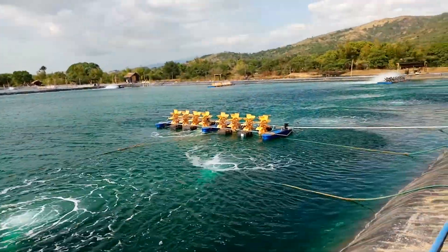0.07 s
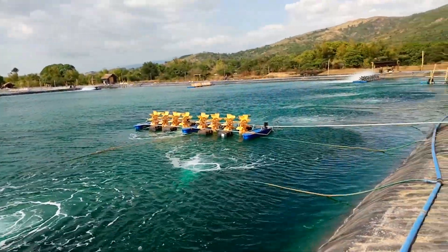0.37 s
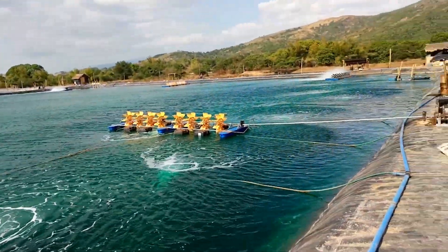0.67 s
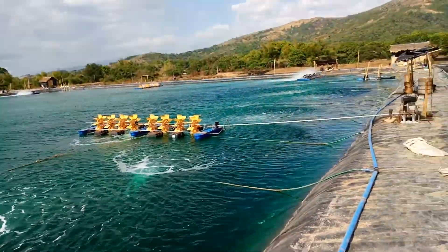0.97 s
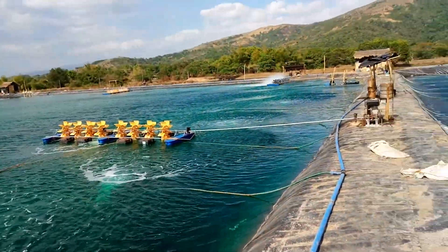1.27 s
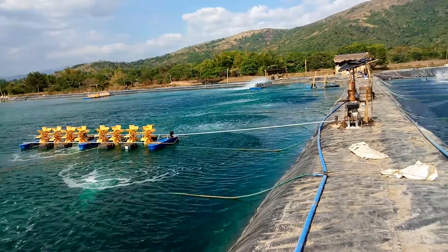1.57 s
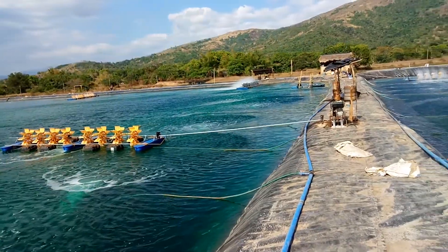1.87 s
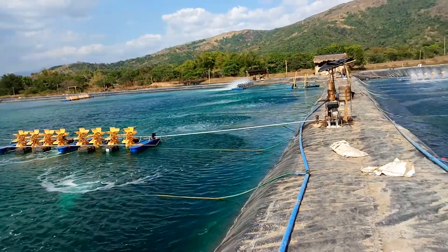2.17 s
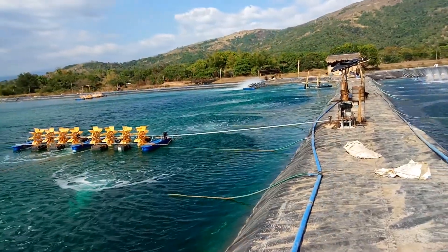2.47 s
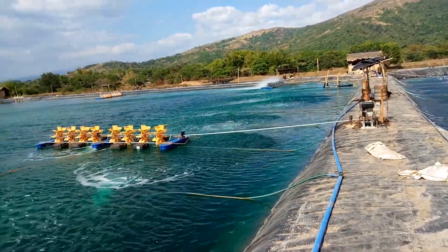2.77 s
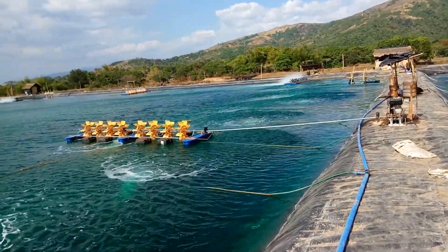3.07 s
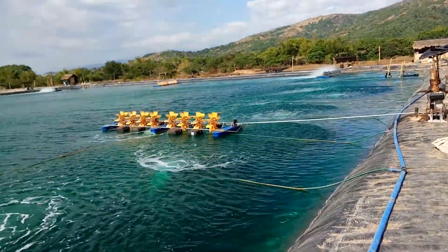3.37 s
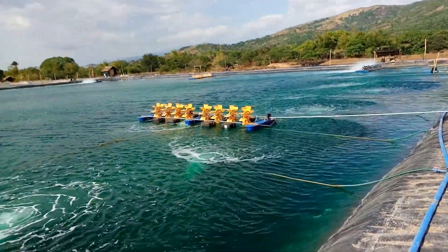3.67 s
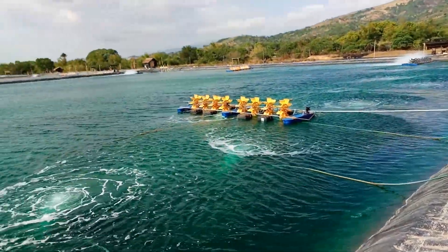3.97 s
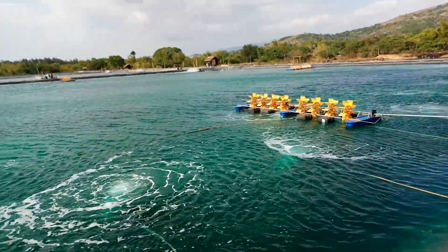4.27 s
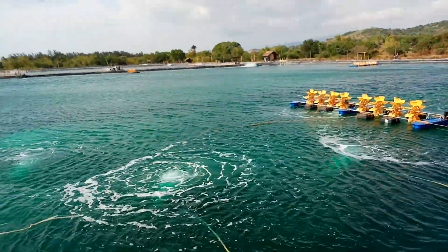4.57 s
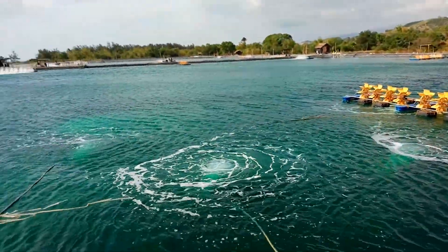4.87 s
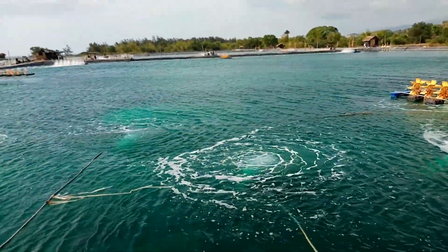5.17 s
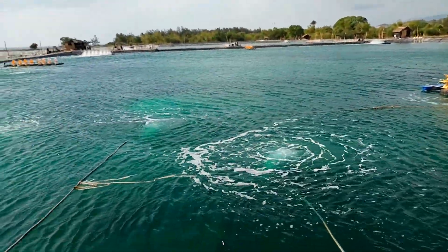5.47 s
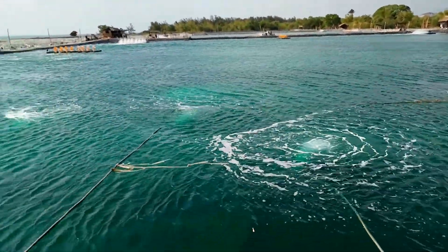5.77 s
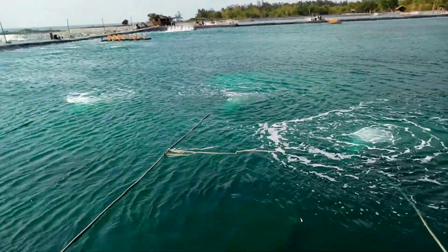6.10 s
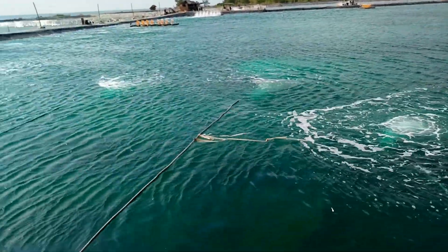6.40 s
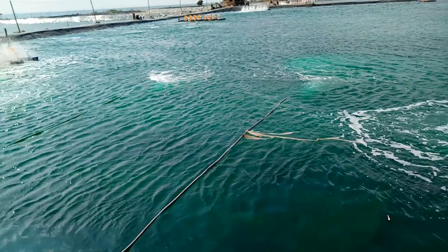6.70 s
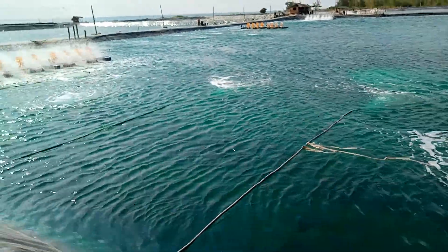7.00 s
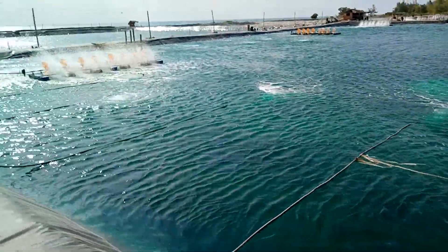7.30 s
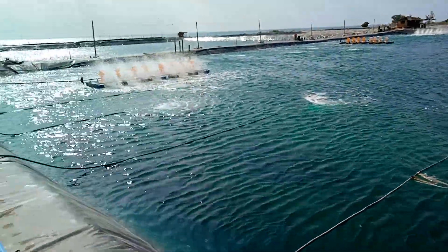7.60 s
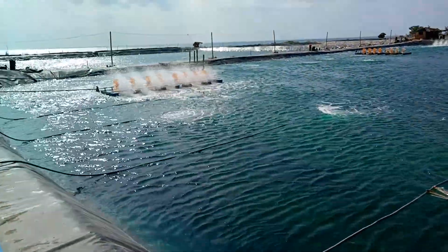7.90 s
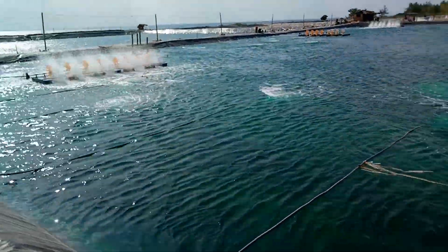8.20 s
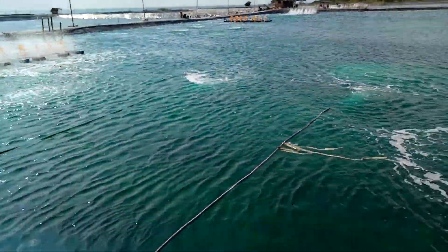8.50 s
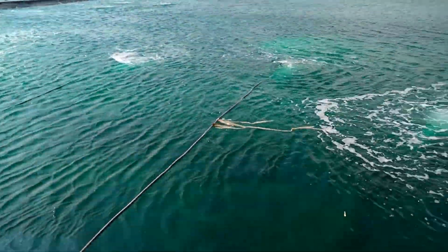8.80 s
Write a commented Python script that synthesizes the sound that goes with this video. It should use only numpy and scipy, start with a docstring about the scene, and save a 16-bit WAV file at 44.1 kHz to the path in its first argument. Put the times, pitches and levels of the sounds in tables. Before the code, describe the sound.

Paddle-wheel aerators churn a large outdoor pond throughout, with sloshing water, hissing spray and small bubbles. Two diesel engines thud slightly out of step, their valves clattering and gears grinding mainly on the left. From the start until about 4 seconds, a dry bearing gives short, high, irregular chirps. Wind rumbles, flutters and pops on the right side of the handheld microphone, with a small dry tick near 1.4 seconds. Foam fizzes briefly around 4.5 seconds. At about 5.3 seconds a hard gust hits with deep thumps, and loud, ragged tearing continues, strongest around 6.5 to 7.3 seconds, pushing the water and engines down beneath it. The metallic clatter grows brighter from about 6.5 seconds. The wind drops briefly near 8 seconds, exposing spray and engine rattle, then buffets hard again until the end, just before 9 seconds.

```python
"""A fish pond in gusty wind. Paddle-wheel aerators churn the water and throw spray; bubbles ring, foam fizzes.
Two slow single-cylinder diesels drive them: exhausts thud, valves clatter, gears grind, a dry bearing chirps.
A handheld microphone pans from the bank across the water towards a spraying wheel.
Gusts buffet its right port, tearing harder and harder, and a compressor ducks the pond under them."""
import sys
import numpy as np
from scipy import signal
from scipy.fft import rfft, irfft, next_fast_len
from scipy.io import wavfile
from scipy.ndimage import uniform_filter1d, map_coordinates

SR = 44100
rng = np.random.default_rng(int(sys.argv[2]) if len(sys.argv) > 2 else 0)


def inscribe(sig):
    """Save sig as 16-bit PCM at rate SR to the path in sys.argv[1].

    A 1-D sig is mono; a 2-D sig holds one channel per row.
    Samples are clipped to [-1, 1] before scaling.
    """
    pcm = np.round(np.clip(np.atleast_2d(sig).T, -1, 1) * 32767)
    wavfile.write(sys.argv[1], SR, pcm.astype(np.int16))


N = 390285


def amp(db):
    """Decibels to gain."""
    return 10 ** (np.asarray(db) / 20)


def unit(x):
    """Scale to rms 1."""
    return x / np.sqrt(np.mean(x ** 2) + 1e-20)


def automation(rows):
    """Breakpoint lanes: one value per sample for each column after the time."""
    times, *columns = np.transpose(rows)
    return [np.interp(np.arange(N) / SR, times, column) for column in columns]


def bumps(rows):
    """A dB lane of smooth rises and dips from rows (centre [s], gain [dB], half length [s])."""
    t = np.arange(0, N, 64) / SR
    lane_db = sum(db * np.exp(-((t - s) / half) ** 2) for s, db, half in rows)
    return np.interp(np.arange(N) / SR, t, lane_db)


def wobble(rate):
    """A smooth random modulator, rate knots a second."""
    place = np.arange(N) * rate / SR
    coarse = np.arange(0, place[-1] + 1, 1 / 10)
    knots = rng.standard_normal(int(place[-1]) + 4)
    return np.interp(place, coarse, map_coordinates(knots, [coarse]))


def filtered(x, response):
    """Filter x by a gain that is a function of frequency."""
    size = next_fast_len(N + SR // 4)
    return irfft(rfft(x, size) * response(np.fft.rfftfreq(size, 1 / SR)), size)[..., :N]


def eq(x, curve):
    """Filter x by points (frequency [Hz], gain [dB]) joined on a log axis."""
    points_hz, db = np.transpose(curve)
    return filtered(x, lambda hz: amp(np.interp(np.log(hz + 1), np.log(points_hz + 1), db)))


def coloured(x, spectrum):
    """x shaped by a spectrum, at rms 1."""
    return unit(eq(x, spectrum))


def stereo_noise(shared):
    """White noise whose two sides share a fraction of their power."""
    return np.sqrt(shared) * rng.standard_normal(N) + np.sqrt(1 - shared) * rng.standard_normal((2, N))


def pan(right_db):
    """Channel gains: left at unity, right trimmed."""
    return amp([[0], [right_db]])


def add(track, s, sound):
    """Mix a sound into a track at time s."""
    part = track[max(0, round(s * SR)):][:len(sound)]
    part += sound[:len(part)]


# Gritty midrange of the gears: (frequency [Hz], relative level [dB])
GEAR_SPECTRUM = [(300, -15.5), (700, -3), (950, -11), (1250, -3.5), (1600, -16), (2100, -17.5), (4000, -33)]
def gearbox(db=-34):
    """The reduction gears grind in a rough band, hard left."""
    grind = stereo_noise(shared=0.081) * amp(0.59 * wobble(53))
    return amp(db) * coloured(grind, GEAR_SPECTRUM) * pan(right_db=-38.0)


# Peaky sizzle of bursting foam: (frequency [Hz], relative level [dB])
FIZZ_SPECTRUM = [(1200, -17), (2500, -1), (3100, -5), (3600, 5), (4100, -8.5), (4900, -23), (5600, 0),
                 (6300, -3), (7000, -25), (15000, -26)]
def foam(db=-30.0, facing_s=4.43, half_s=0.46):
    """Foam fizzes over the air diffuser, swelling as the microphone sweeps past it."""
    facing = np.exp(-((np.arange(N) / SR - facing_s) / half_s) ** 2)
    grains = stereo_noise(shared=0.15) * amp(2.7 * wobble(600) + 2.3 * wobble(14))
    return amp(db) * facing * coloured(grains, FIZZ_SPECTRUM) * pan(right_db=-4.5)


def bubbles(pitch_hz=3000, spread=0.37, life_cycles=9, count=6000, samples=192):
    """Bubbles burst out of the aerated water; each rings for a few cycles, rising in pitch."""
    chance = rng.standard_normal((count, 2))
    starts = rng.integers(0, N - samples, count)
    hz = np.minimum(pitch_hz * np.exp(spread * chance[:, :1]), SR / 4)
    cycles = hz * np.arange(samples) / SR
    envelopes = amp(7.3 * chance[:, 1:]) * np.exp(-3 * cycles / life_cycles)
    rings = envelopes * np.sin(2 * np.pi * cycles * (1 + 0.12 * cycles / life_cycles))
    positions = starts[:, None] + np.arange(samples)
    return unit(np.bincount(positions.ravel(), rings.ravel(), N))


# Body of the churn and hiss of the spray, each: (frequency [Hz], relative level [dB])
CHURN_SPECTRUM = [(40, -24), (150, -11), (330, 14.5), (550, 8), (900, 0), (1300, -6.5), (2000, 0),
                  (3000, -1), (4500, -7), (6000, -2), (9000, -7.5), (15000, -16.5)]
SPRAY_SPECTRUM = [(500, -58.5), (2000, -12), (2800, -2.5), (3500, 8), (4100, 6), (4700, -4), (6000, -64),
                  (15000, -50)]
# Brief swells of the spray's hiss, mostly in lulls of the wind: (centre [s], boost [dB], half length [s])
SPRAY_SWELLS = [(1.77, 4, .04), (2.63, 4, .03), (2.95, 5, 0.028), (3.57, 10, 0.021), (4.21, 5, 0.039),
                (4.39, 6.5, .04), (4.57, 8, 0.045)]
# Fader rides as the microphone turns: (time [s], spray [dB], engine clatter [dB], bubbles [dB])
AIM_FADERS = [(0, -29.5, -34, -55), (.5, -25.5, -27, -40), (1.2, -26.5, -46, -46), (2.3, -30, -50, -43),
              (3.3, -30.5, -42, -58), (3.6, -27, -35.5, -36), (4.4, -30, -33.5, -45), (5, -28, -33.5, -44),
              (5.8, -33, -31, -54), (6.5, -32, -22.5, -41), (7.3, -49, -18.5, -27), (8, -20.5, -19, -57),
              (8.4, -31, -19, -24), (8.85, -31, -21.5, -30)]
def water():
    """Paddles churn the pond and throw spray that falls back as countless drops; air boils up nearby."""
    spray_db, _, bubble_db = automation(AIM_FADERS)
    slosh = stereo_noise(shared=0.045) * amp(3.06 * wobble(40))
    churn = coloured(slosh, CHURN_SPECTRUM)
    drops = stereo_noise(shared=0.11) * amp(2.6 * wobble(700) + 2.6 * wobble(35))
    spray = coloured(drops, SPRAY_SPECTRUM) * pan(right_db=-31.0)
    boil = np.array([bubbles(), bubbles()]) * amp(1.2 * wobble(7.7)) * pan(right_db=1.5)
    return amp(-28.5) * churn + amp(spray_db + bumps(SPRAY_SWELLS) - 2.0) * spray + amp(bubble_db) * boil


SECOND_ENGINE_HZ = 14.66  # firing rate
# Squeaks of the second engine's bearing: (time [s], level [dB])
CHIRPS = [(0.027, -30.5), (0.096, -22), (0.163, -24), (0.231, -24), (0.266, -25), (0.3, -19),
          (0.371, -14.5), (0.44, -20), (0.575, -25), (0.921, -22), (1.059, -20), (1.399, -19), (1.446, -19),
          (1.72, -15), (2.683, -26), (2.751, -22), (2.888, -18), (2.922, -29), (2.956, -16.5), (3.093, -25),
          (3.161, -34), (3.642, -31), (3.71, -37), (3.911, -23), (3.983, -25)]
def bearing(pitch_hz=4100, wander_hz=30.25, half_s=0.0054, rub_db=-34, roughness=0.71):
    """A dry bearing chirps roughly, over a faint rubbing twice each turn that fades out midway."""
    envelope = np.zeros(N)
    t = np.arange(-SR // 40, SR // 40) / SR
    for s, db in CHIRPS:
        add(envelope, s + t[0], amp(db) * np.exp(-(t / half_s) ** 2))
    time = np.arange(N) / SR
    rubs = np.cos(2 * np.pi * SECOND_ENGINE_HZ * (time - CHIRPS[0][0])) ** 4
    fade_out = np.interp(time, [3.9, 5], [1, 0])
    envelope += amp(rub_db + 3.3 * wobble(24.8) + 3 * wobble(2.6)) * rubs * fade_out
    cycles = np.cumsum(pitch_hz + wander_hz * wobble(43)) / SR
    tone = np.sin(2 * np.pi * cycles + roughness * wobble(300))
    return envelope * tone * pan(right_db=-16.5)


# Exhaust pipe resonances: (frequency [Hz], relative level [dB], t60 [s])
PIPE_MODES = [(131, -7.5, 0.028), (256, -3, 0.013), (312, 2.5, 0.024), (380, 4, 0.014)]
def exhaust(cycles, attack_s=0.004, scatter_db=1.3):
    """One pressure pulse for each firing swells and rings in the exhaust pipe."""
    firings = np.flatnonzero(np.diff(np.floor(cycles)))
    out, t = np.zeros(N), np.arange(SR // 16) / SR
    attack = 1 - np.exp(-(t / attack_s) ** 2)
    for start in firings:
        offsets_db = scatter_db * rng.standard_normal(len(PIPE_MODES))
        ring = sum(amp(db + offset_db - 60 * t / t60) * np.sin(2 * np.pi * hz * t)
                   for (hz, db, t60), offset_db in zip(PIPE_MODES, offsets_db))
        add(out, start / SR, ring * attack)
    return unit(out)


# Tempo of the main engine: (time [s], firing rate [Hz])
ENGINE_SPEED = [(0, 13.72), (1.1, 13.72), (1.5, 14.33), (2.1, 13.75), (4.3, 13.76), (5, 13.6), (6, 13.75),
                (8.85, 13.76)]
# Exhaust faders, one list for the main engine and one for the second: (time [s], level [dB])
EXHAUST_FADERS = [(0, -22), (2, -22), (4, -24), (5.5, -23), (7, -22), (8, -23), (8.85, -22)], [(0, -31),
                  (2, -31.5), (4, -28.5), (5.5, -47), (8.85, -27.5)]
# Injector and valve gear knocks: (delay after firing [cycles], relative level [dB], decay [cycles])
VALVE_KNOCKS = [(0.78, -7.5, 0.1), (0.83, -1.5, 0.055), (0.37, -28, 0.04), (0.24, -5, 0.04),
                (0.99, -1.5, 0.0063)]
def engines():
    """Two diesels thud slightly out of step; the main one also clatters in time with its shaft."""
    cycles = np.cumsum(automation(ENGINE_SPEED)[0]) / SR - .5
    second_cycles = SECOND_ENGINE_HZ * np.arange(N) / SR
    main_db, second_db = (automation(fader)[0] for fader in EXHAUST_FADERS)
    thuds = amp(main_db) * exhaust(cycles) + amp(second_db) * exhaust(second_cycles)
    knocks = sum(amp(db) * np.exp(-((cycles - at) % 1) / decay) for at, db, decay in VALVE_KNOCKS)
    return thuds * pan(right_db=-2.5) + clatter(knocks) * pan(right_db=-13.0)


# Bright metallic edge of the valve gear: (frequency [Hz], relative level [dB])
CLATTER_SPECTRUM = [(500, -24), (2000, -21), (3200, -1), (4500, -0.5), (5600, 1.5), (6500, -1), (9000, -5),
                    (15000, -12.5)]
def clatter(knocks, floor=0.26):
    """Each knock of metal on metal is a burst of bright noise over a constant rattle."""
    _, clatter_db, _ = automation(AIM_FADERS)
    rattle = stereo_noise(shared=0.093) * (floor + knocks) * amp(0.74 * wobble(29))
    return amp(clatter_db) * coloured(rattle, CLATTER_SPECTRUM)


# Small ticks on the microphone's housing: (time [s], relative level [dB])
HOUSING_TICKS = [(1.422, -16.5), (1.607, -25.5)]
def ticks(gain_db=11.5, t60=0.015):
    """Dry ticks beside the right port."""
    out, t = np.zeros(N), np.arange(SR // 50) / SR
    for s, db in HOUSING_TICKS:
        add(out, s, amp(db + gain_db - 60 * t / t60) * rng.standard_normal(len(t)))
    return out * amp([[-12], [0]])


# Low end of the wind: (frequency [Hz], relative level [dB])
RUMBLE_SPECTRUM = [(15, -24), (30, -22), (50, -7.5), (80, -1), (130, -0.5), (200, -4), (300, -8.5),
                   (450, -19), (700, -30), (1500, -74.5), (4000, -110)]
def rumble(lumps_db):
    """Slow eddies push on one port."""
    return coloured(rng.standard_normal(N) * amp(lumps_db * wobble(35)), RUMBLE_SPECTRUM)


def slaps(kicks, hz):
    """Each kick throws the membrane out and back in one short, round swing."""
    phase = np.arange(SR // 50) / SR * 2 * np.pi * np.sqrt(3) * hz
    swing = phase ** 2 * (3 - phase) * np.exp(-phase)
    return signal.oaconvolve(kicks, swing / swing.max())[:N]


def flutter(pitch_hz=190, per_second=45, scatter_db=6):
    """Lesser eddies slap softly and unevenly, with gaps between them."""
    sizes = rng.choice([-1, 1], N) * amp(scatter_db * np.tanh(rng.standard_normal(N)))
    return slaps(sizes * (rng.random(N) < per_second / SR), pitch_hz)


# The wind's angle to the port makes the tearing bright and ragged or a dull, dense roar:
# (time [s], corner at full strength [Hz], raggedness [dB])
TEAR_TONE = [(0, 1150, 3.5), (4.9, 1160, 6), (5.4, 1520, 6.5), (6.5, 2020, 7), (7.25, 2210, 6.5),
             (7.45, 1410, 5), (7.8, 1040, 1), (8.05, 920, -5), (8.15, 1910, 5), (8.44, 1920, 5),
             (8.85, 1850, 5.5)]
def tearing(strength, db_per_octave=15, steepness=2.69):
    """Air tears across the port: the stronger the eddy, the brighter."""
    corner_hz = automation(TEAR_TONE)[0] * 2 ** (20 * np.log10(strength) / db_per_octave)
    centres = np.geomspace(250, 16000, 7)
    weights = np.array([np.sqrt(hz) / (1 + (hz / corner_hz) ** steepness) for hz in centres])
    weights /= np.linalg.norm(weights[1:], axis=0)
    octave = lambda centre: lambda hz: np.sqrt(np.maximum(0, 1 - np.abs(np.log2((hz + 1) / centre))))
    bands = np.array([unit(filtered(rng.standard_normal(N), octave(hz))) for hz in centres])
    return strength * np.sum(weights * bands, axis=0)


def eddies(force_db, per_second=150, wake_s=0.0017):
    """Strength of the small eddies, each with a sharp front and a short wake."""
    t = np.arange(SR // 16) / SR
    fronts = rng.standard_normal(N) * (rng.random(N) < per_second / SR)
    wakes = signal.oaconvolve(np.abs(fronts), np.exp(-t / wake_s))[:N]
    swirl = unit(unit(wakes - wakes.mean()) + 0.21 * wobble(37) + 1.14 * wobble(170))
    # light wind tears only now and then; strong wind tears to its limit, between short gaps
    limit = np.interp(force_db, [-24, -5], [2.8, 1.5])
    _, ragged_db = automation(TEAR_TONE)
    bursts = amp(ragged_db * limit * np.tanh(swirl / limit))
    running_rms = np.sqrt(np.abs(uniform_filter1d(bursts ** 2, SR // 8)))
    return amp(force_db) * bursts / running_rms


# The hardest eddies on the right port: (time [s], force [dB], length [s])
HARD_EDDIES = [(0.06, -13.5, 0.003), (0.098, -12, 0.005), (0.341, -12, 0.0037), (0.384, -14.5, 0.0042),
               (0.942, -11, 0.003), (0.964, -17, 0.0046), (1.033, -21, 0.003), (1.047, -18.5, 0.005),
               (1.192, -19, 0.004), (1.251, -11, 0.0034), (1.305, -10.5, 0.0057), (1.321, -10, 0.003),
               (1.334, -13.5, 0.017), (1.419, -16, 0.01), (1.606, -9, 0.003), (1.629, -15, 0.014),
               (1.821, -12, 0.026), (1.878, -15.0, 0.007), (2.017, -9.5, 0.003), (2.026, -12, 0.005),
               (2.172, -17, 0.017), (2.206, -9.5, 0.003), (2.221, -12.0, 0.003), (2.26, -12.5, 0.003),
               (2.299, -12.5, 0.005), (2.35, -14.5, 0.01), (2.42, -10.5, 0.0038), (2.47, -15.5, 0.006),
               (2.49, -14, 0.00275), (2.504, -11.5, 0.0028), (2.675, -15.5, 0.0028), (2.691, -17.5, 0.013),
               (2.766, -13.5, 0.0024), (2.787, -15.0, 0.0027), (2.849, -7, 0.017), (2.888, -14, 0.003),
               (2.901, -19, 0.0045), (2.982, -15, 0.0044), (3.052, -14, 0.0025), (3.101, -10.5, 0.0025),
               (3.145, -12.5, 0.003), (3.249, -18, 0.003), (3.603, -18, 0.0045), (3.625, -14.5, 0.0054),
               (3.725, -16.5, 0.0077), (3.782, -16.5, 0.0036), (3.917, -8.5, 0.0036), (3.965, -17, 0.0036),
               (4.203, -19.5, 0.0046), (4.686, -10, 0.0038), (4.805, -10, 0.0077), (4.825, -14, 0.003),
               (4.875, -12, 0.012), (4.895, -13, 0.0033), (4.947, -13, 0.004), (4.961, -18, 0.008),
               (4.982, -16, 0.018), (5.017, -18, 0.0033), (5.072, -13.5, 0.0057), (5.117, -19, 0.0045),
               (5.133, -24, 0.0049), (5.224, -7.5, 0.0037), (5.25, -12, 0.009), (5.279, -4.5, 0.003),
               (5.318, -1, 0.0058), (5.33, -3, 0.004), (5.358, 5.5, 0.011), (5.38, 1.5, 0.0077),
               (5.398, 2, 0.015), (5.428, -1, 0.0061), (5.433, -8, 0.02), (5.488, -9, 0.0056),
               (5.531, -3.5, 0.0035), (5.568, -13.0, 0.0066), (5.591, -9.5, 0.006), (5.736, -10, 0.0092),
               (5.754, -6, 0.004), (5.822, -12.5, 0.0065), (5.849, -13, 0.0055), (5.938, -7, 0.008),
               (5.962, -8.5, 0.0043), (6.004, -6.5, 0.004), (6.028, 2, 0.0025), (6.067, 2, 0.013),
               (6.089, -3.5, 0.056), (6.154, -9, 0.0036), (6.169, -7, 0.007), (6.201, -5, 0.0062),
               (6.257, -8, 0.0068), (6.284, -4, 0.008), (6.313, -1.5, 0.004), (6.367, -5.5, 0.0043),
               (6.411, -3, 0.032), (6.458, -0.5, 0.025), (6.534, -5, 0.014), (6.559, 0, 0.014),
               (6.604, -2, 0.02), (6.683, -4.5, 0.004), (6.699, -3.5, 0.019), (6.74, -4.5, 0.0099),
               (6.766, -4, 0.0071), (6.803, -4, 0.0062), (6.84, -2, 0.018), (6.87, -2.5, 0.0094),
               (6.889, -0.5, 0.006), (6.91, -5.0, 0.005), (6.938, 1.5, 0.0093), (6.95, -1, 0.0046),
               (6.978, 3, 0.014), (6.998, 1, 0.02), (7.029, -4, 0.028), (7.066, -1, 0.014),
               (7.101, 0, 0.023), (7.129, 0.5, 0.029), (7.204, 2, 0.0082), (7.226, 0.5, 0.076),
               (7.371, -6, 0.02), (7.4, -1, 0.034), (7.577, -1.5, 0.02), (7.71, -2.5, 0.0047),
               (7.741, -6.5, 0.033), (7.918, -19, 0.013), (7.951, -14.5, 0.012), (7.988, -16, 0.015),
               (8.016, -15, 0.003), (8.042, -15, 0.011), (8.131, -4.5, 0.014), (8.156, -5, 0.0097),
               (8.211, -1, 0.019), (8.235, 6.5, 0.0094), (8.277, -14, 0.005), (8.365, -1.5, 0.016),
               (8.385, -1.0, 0.027), (8.47, -3, 0.017), (8.495, 1.5, 0.017), (8.549, 6.5, 0.0036),
               (8.576, 0.5, 0.032), (8.64, -1, 0.0077), (8.677, -0.5, 0.0075), (8.764, -6, 0.034),
               (8.828, 2.5, 0.0076)]
def buffets(attack_s=0.00054, release_s=0.0034):
    """Pressure of single eddies: each arrives at once, sags and lets go."""
    out, t = np.zeros(N), np.arange(SR // 8) / SR
    attack = 1 - np.exp(-t / attack_s)
    for s, db, length in HARD_EDDIES:
        sag = amp(-3 * np.minimum(t / length, 1))
        release = np.exp(-np.maximum(0, t - length) / release_s)
        add(out, s, amp(db) * attack * sag * release)
    return out


def pops(drive_db=6, ceiling=0.82, pitch_hz=300, lag_s=0.00148):
    """The front of every hard eddy slaps the port."""
    kicks = np.zeros(N)
    for s, force_db, _ in HARD_EDDIES:
        size = ceiling * np.tanh(amp(force_db + drive_db) / ceiling)
        kicks[min(N - 1, round((s + lag_s) * SR))] = rng.choice([-1, 1]) * size
    return slaps(kicks, pitch_hz)


# Muffled body of an eddy: (frequency [Hz], relative level [dB])
PUNCH_SPECTRUM = [(40, -11), (150, -1), (450, -3), (950, -6.5), (1600, -27), (4000, -68.5)]
def punch(hits, db=-8, choke=0.34):
    """The dull pop under each hard eddy; it stops growing once the port is choked."""
    return amp(db) * np.tanh(hits / choke) * coloured(rng.standard_normal(N), PUNCH_SPECTRUM)


# Sub-bass shoves on the right port: (time [s], level [dB], length [s], pitch [Hz])
SUB_THUMPS = [(5.364, 3, 0.055, 42.6), (5.402, 1.5, 0.07, 50), (6.303, -7, 0.13, 60),
              (6.939, -5, 0.047, 42), (8.48, -3, 0.06, 45)]
def thumps():
    """The membrane is shoved aside and swings back unevenly, deep and short."""
    out, t = np.zeros(N), np.arange(SR // 4) / SR
    stagger = wobble(50)
    for s, db, length, hz in SUB_THUMPS:
        phase = 2 * np.pi * hz * t + stagger[int(s * SR):][:len(t)]
        add(out, s, amp(db) * np.exp(-(t / length) ** 2 * 2) * np.sin(phase - phase[0]))
    return out


# Rumble fader of the sheltered left port: (time [s], level [dB])
LEE_FADER = [(0.4, -13.5), (1.6, -19.5), (2.8, -18), (3.8, -18.5), (5.15, -15), (5.6, -21), (8.85, -15.5)]
# Exposed right port, light at first, then gusting with one lull: (time [s], rumble [dB], tearing [dB])
GUST_FADERS = [(0, -4.5, -14), (0.2, -7.5, -27.5), (0.7, -7.5, -28), (1.35, -10.5, -25.5), (2.3, -7.5, -24),
               (2.75, -12.5, -31), (3.3, -11.5, -26), (3.75, -13.5, -29), (4.4, -10.5, -34),
               (4.8, -8.5, -21), (5.15, -12.5, -23), (5.4, -7.5, -6), (5.66, -11, -18),
               (5.85, -12.5, -13.5), (6.02, -10.5, -12.5), (6.14, -8, -10), (6.3, -16, -11),
               (6.5, -3.5, -1.5), (6.66, -10.5, -11), (6.82, -13, -8.5), (7.2, -6, -3), (7.33, -10, -9.5),
               (7.52, -10, -7), (7.76, -6.5, -6.5), (7.84, -7, -10), (7.87, -18.5, -28), (8.11, -18, -15),
               (8.22, -4, -6), (8.33, -8, -9), (8.44, -4.5, -1), (8.56, -4, -8.5), (8.73, -8.5, -6.5),
               (8.85, -12.5, -2.5)]
# Mostly dips, where the wind slackens between eddies: (centre [s], gain [dB], half length [s])
WIND_SLACKS = [(0.995, -5, .018), (1.27, -6, 0.014), (1.5, -13, 0.017), (1.67, -7, 0.012),
               (1.91, -12, 0.014), (2.13, -12, 0.02), (2.61, -11, 0.034), (2.74, -4, 0.022),
               (3.2, 1, 0.019), (3.47, -10, 0.018), (3.95, 1, 0.049), (4.48, -2.5, 0.018),
               (4.93, -8, 0.013), (7.87, -5, 0.025), (8.19, -13.5, 0.011), (8.74, -12, 0.014)]
def wind(swell_rate=9.7, sputter_rate=190, sputter_db=1.5):
    """Each port has its own turbulence; only the exposed right one flutters, pops and tears."""
    rumble_db, tear_db = automation(GUST_FADERS)
    swell_db = wobble(swell_rate)  # rumble and tearing breathe together
    left = amp(automation(LEE_FADER)[0]) * rumble(lumps_db=3.5)
    hits = buffets() * amp(sputter_db * wobble(sputter_rate))
    # every hard eddy also nudges the membrane: a low push
    push = signal.sosfilt(signal.butter(2, [22, 75], "bandpass", fs=SR, output="sos"), hits)
    slack_db = bumps(WIND_SLACKS)
    turbulence = eddies(tear_db + 0.7 * swell_db) * amp(slack_db)
    tear = tearing(np.hypot(turbulence, amp(2.5) * hits))
    roll = amp(rumble_db + slack_db + swell_db) * (rumble(lumps_db=3.0) + amp(1.5) * flutter())
    right = roll + amp(-0.5) * tear + punch(hits) + pops() + amp(-12) * push + thumps()
    return np.array([left, right])


def scene():
    """The pond, its machines and the wind on the microphone."""
    return water() + foam() + engines() + gearbox() + bearing() + wind() + ticks()


# Treble dulled above 7 kHz, with a thin band of hiss near 15 kHz: (frequency [Hz], gain [dB])
TREBLE_EQ = [(20, 0), (6300, 0), (7100, -7), (8000, -22), (11000, -21), (13800, -23.5), (14700, -11),
             (15400, -11)]
def record(dry, threshold_db=-19, slope=0.62, deepest_db=12.0, makeup_db=3.0, window_s=0.079, top_hz=15650):
    """One compressor ducks both channels; the treble is dulled; gust peaks saturate and clip."""
    power = np.abs(uniform_filter1d(dry ** 2, int(window_s * SR), axis=1)).max(axis=0)
    duck_db = np.clip(slope * (10 * np.log10(power + 1e-12) - threshold_db), 0, deepest_db)
    ducked = dry * amp(makeup_db - uniform_filter1d(duck_db, SR // 50))
    saturated = ducked / (1 + (ducked / 1.25) ** 4) ** (1 / 4)
    # clipping the hardest gusts spits crackle into the top treble
    clipped = np.clip(eq(saturated, TREBLE_EQ), -.98, .98)
    return filtered(clipped, lambda hz: hz < top_hz)


dry = scene()
out = record(dry)
inscribe(out)
```